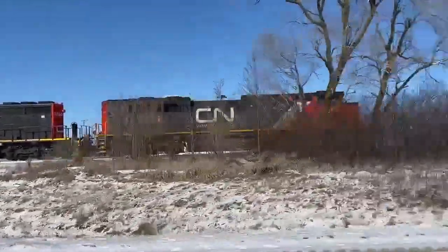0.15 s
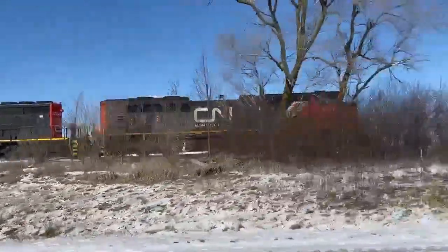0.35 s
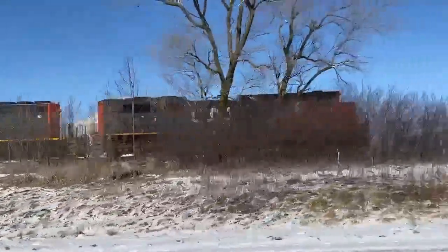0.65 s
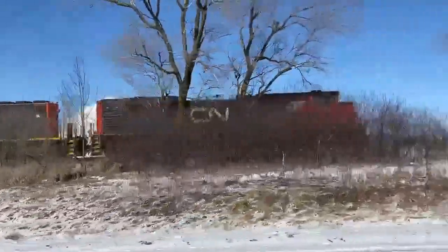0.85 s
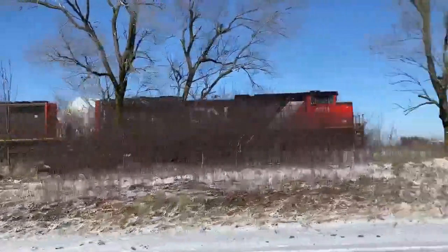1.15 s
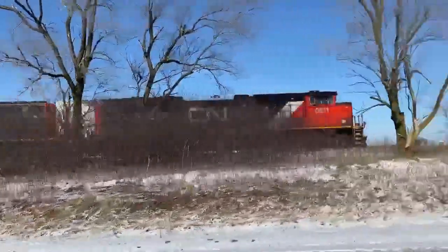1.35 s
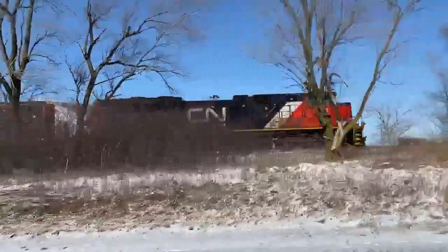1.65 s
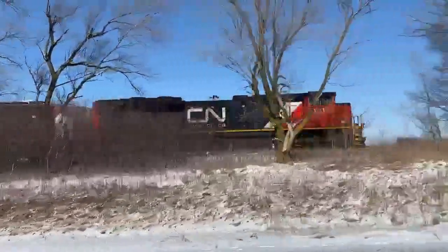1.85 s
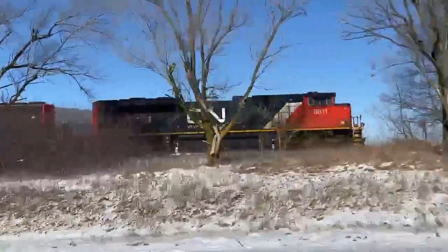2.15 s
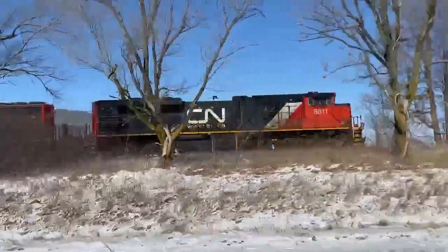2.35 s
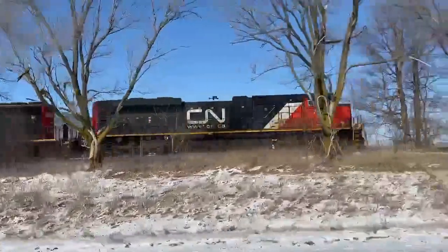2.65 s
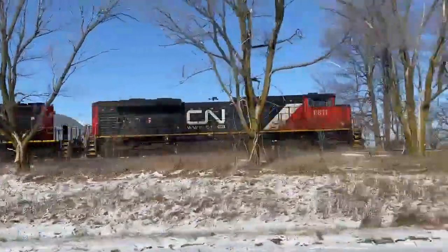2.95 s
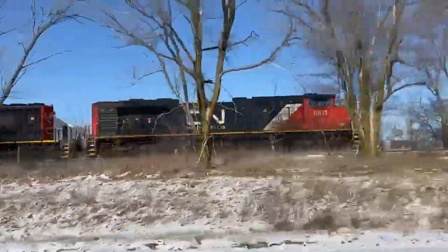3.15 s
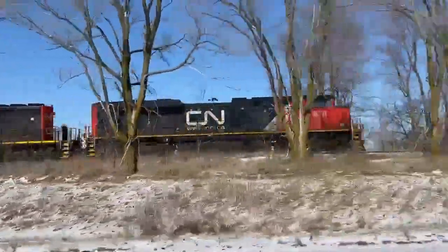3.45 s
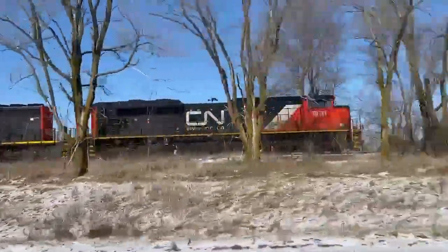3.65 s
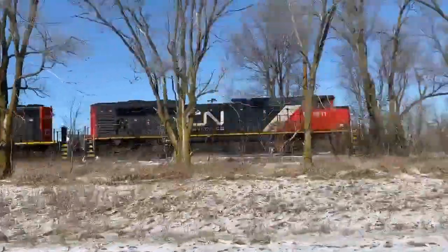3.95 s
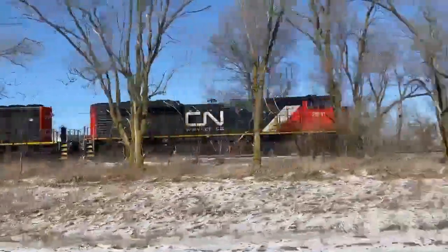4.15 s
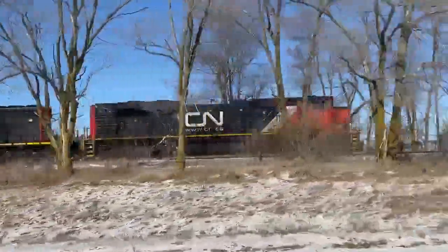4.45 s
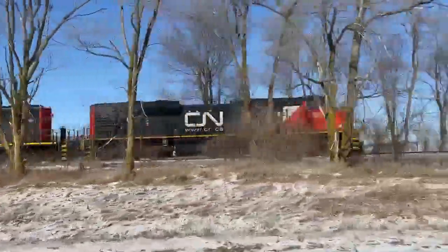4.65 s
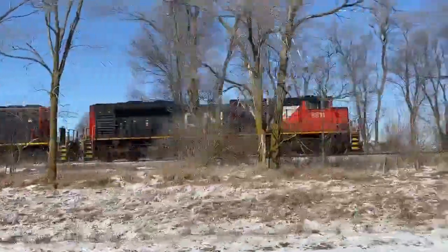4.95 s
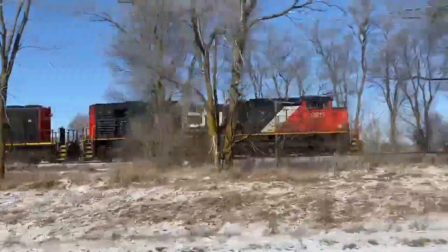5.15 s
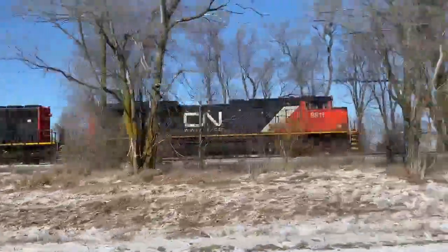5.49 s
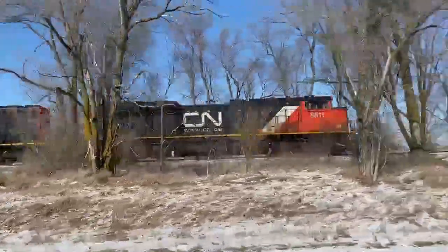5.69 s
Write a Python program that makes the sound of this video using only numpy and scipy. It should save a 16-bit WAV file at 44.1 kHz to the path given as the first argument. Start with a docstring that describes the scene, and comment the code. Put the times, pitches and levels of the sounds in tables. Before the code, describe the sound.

A deep diesel locomotive throb swells and climbs slightly in pitch, over road roar, wind rumble, rattling grit and hollow knocks, heard from a moving car.

```python
"""A deep diesel exhaust throb rules: locomotives speed up behind trees, heard from a car keeping pace.
Each firing is one cycle of a tone; unequal cylinders make it swell and hurry once an engine cycle.
Shaped noise gives the engines' growl, wind at the open window, the roar of wheels and tyres, and hiss.
Resonated noise gives a turbocharger whine and a venting valve; wavering tones give brief wheel squeals.
Short bursts of pitch give road bumps, knocks from the running gear and grit ticking on the car."""
import sys
import numpy as np
from scipy import signal
from scipy.io import wavfile
from scipy.ndimage import uniform_filter1d

SR = 44100
rng = np.random.default_rng(int(sys.argv[2]) if len(sys.argv) > 2 else 0)


def dump(signal):
    """Clip the signal to [-1, 1] and save it as 16-bit WAV at the path in sys.argv[1]."""
    limited = np.clip(np.atleast_2d(signal).T, -1, 1)
    pcm = np.round(limited * 32767).astype(np.int16)
    wavfile.write(sys.argv[1], SR, pcm)


N = 256662  # length in samples

# Rolling roar before splashes, throb and body resonances: t/s, level/dB, brightness/(dB per octave)
ROLLING_CURVE = [(0.0, -40, -0.5), (0.37, -36.5, -1.5), (0.88, -38, -1.5), (1.52, -34, -1),
                 (2.12, -35, 0.5), (2.3, -41.5, 0.5), (2.55, -35.5, -1), (2.82, -33, 2), (2.95, -37.5, 2.5),
                 (3.14, -37.5, 0), (3.29, -35.5, 1), (3.78, -35, 1), (4.08, -35, 2.5), (4.6, -31.5, -1),
                 (4.97, -33, 1.5), (5.2, -31.5, -0.5), (5.55, -30.5, -2), (5.82, -29.5, 1.5)]


def gain_of(db):
    """Turns decibels into an amplitude factor."""
    return 10 ** (np.asarray(db) / 20)


def evened(x):
    """Scales a signal to rms 1."""
    return x / np.sqrt(np.mean(x ** 2) + 1e-20)


def read(points, hz):
    """Reads a spectrum at hz, interpolating on a log-frequency axis."""
    f, value = np.transpose(points)
    return np.interp(np.log(hz + 1), np.log(f + 1), value)


def columns(rows, t):
    """Reads every column of a time curve at times t."""
    s, *values = np.transpose(rows)
    return [np.interp(t, s, v) for v in values]


def resonate(x, hz, width):
    """Shifts hz down to zero, smooths, and shifts back: a resonance of gain 1, width in Hz."""
    turn = np.exp(2j * np.pi * np.cumsum(hz * np.ones(x.shape[-1])) / SR)
    r = np.exp(-np.pi * width / SR)
    smooth = signal.lfilter([1 - r], [1, -r], x / turn)
    return 2 * (turn * smooth).real


def wobble(count, span):
    """Slow random drift of rms 1: white noise averaged twice over span points."""
    span = max(int(span), 1)
    drift = uniform_filter1d(rng.standard_normal(count), span)
    return evened(uniform_filter1d(drift, span))


def noise(colour, curve, band, pivot_hz, patchy_db, flicker_db, size):
    """Stereo noise: a spectrum tilted about a pivot, random patches and a flicker shared by all pitches."""
    # Likeness of left and right: f/Hz, correlation
    likeness = [(200, 1), (260, .93), (350, .7), (500, .45), (900, .38), (1460, .3), (2080, .72),
                (3000, .76), (4200, .82), (6200, .78), (8200, .55), (9800, .36), (11000, .45), (12000, .62)]
    # Stereo lean: f/Hz, left over right/dB
    lean = [(210, 0), (300, 1.1), (1000, 1), (4000, .8), (6200, .4), (8000, -1), (12000, .2)]
    hop, hz = size // 4, np.fft.rfftfreq(size, 1 / SR)
    frames = N // hop + 5
    a, b, c, d, patches = rng.standard_normal((frames, len(hz), 5)).T
    patches = uniform_filter1d(uniform_filter1d(patches, 2560 // hop, 1), size // 80, 0)
    patches = evened(patches)

    level_db, *tilt = columns(curve, np.arange(frames) * hop / SR)
    octaves = np.log2(hz / pivot_hz + .01)[:, None]
    shape = gain_of(read(colour, hz)[:, None] + octaves * sum(tilt, np.zeros(frames)))
    inside = (hz >= band[0]) & (hz <= band[1])
    shape /= np.sqrt((shape[inside] ** 2).sum(0) / 1.5)  # the named band gets rms 1

    same = np.clip(read(likeness, hz), -1, 1)[:, None]
    left = a + 1j * b
    right = same * left + np.sqrt(1 - same ** 2) * (c + 1j * d)
    z = np.array([left, right])
    z *= gain_of(read(lean, hz)[:, None] * np.array([.5, -.5])[:, None, None])
    z *= shape * gain_of(level_db + patchy_db * patches + flicker_db * wobble(frames, 1024 // hop))
    return signal.istft(z, nperseg=size, noverlap=size - hop)[1][:, :N]


def exhaust():
    """One boom a firing; unequal cylinders make it swell and hurry once a cycle. Also gives that swell."""
    # Engine speed: t/s, firing rate f/Hz
    speed = [(0, 67.8), (.4, 68.62), (1.6, 72.5), (2.2, 75.04), (2.5, 75.72), (3.4, 77), (4.4, 78),
             (4.8, 78.18), (5.4, 78.96), (5.82, 79.38)]
    # Exhaust: t/s, level/dB, uneven strength of the cylinders/(0 to 1)
    load = [(0, -25, 0.07), (.25, -28, 0.76), (.37, -22, 0.36), (.48, -26.5, 0.64), (.6, -22.5, 0.72),
            (.9, -24.5, 0.34), (1.1, -17, 0.42), (1.4, -16.5, 0.46), (1.6, -21.5, 0.24), (2, -17, 0.3),
            (2.1, -22.5, 0.03), (2.25, -18.5, 0.15), (2.42, -20.5, .3), (2.5, -25, 0.2), (2.6, -21.5, 0.1),
            (2.72, -23, 0.2), (2.8, -21.5, 0), (3.15, -17.5, 0.2), (3.35, -19.5, 0), (3.52, -18.5, 0.44),
            (3.8, -14, 0.3), (3.9, -15, 0.14), (4.1, -11.5, 0.3), (4.3, -11, 0.1), (4.62, -9.5, 0.1),
            (4.7, -15.5, 0.5), (4.8, -15, 0.25), (4.9, -12, 0.25), (5.2, -10.5, 0.08), (5.3, -10.5, 0.23),
            (5.4, -16, 0.3), (5.55, -13.5, 0.5), (5.65, -18, 0.36), (5.82, -17.5, 0.1)]
    # Weaker tones: multiple of the cycle rate, level under the firing tone/dB
    orders = [(15, -31), (16, -29.5)]
    cylinders = 8  # firings in one engine cycle
    strong_rad = 1.05  # place of the strongest cylinder in the cycle
    slow_hz, fast_hz = 75.5, 77.3  # the timing shifts between these firing rates
    early_slow_rad, early_fast_rad = 0.26, 0.36  # depth of the uneven timing
    place_slow_rad, place_fast_rad = 1.3, .8  # place of the earliest cylinder in the cycle

    t = np.arange(N) / SR
    (hz,), (level_db, uneven) = columns(speed, t), columns(load, t)
    slow = np.clip((fast_hz - hz) / (fast_hz - slow_hz), 0, 1)
    early = early_fast_rad + (early_slow_rad - early_fast_rad) * slow
    place = place_fast_rad + (place_slow_rad - place_fast_rad) * slow
    cycle = 2 * np.pi * np.cumsum(hz / cylinders) / SR
    strength = 1 + uneven * np.cos(cycle - strong_rad)
    boom = strength * np.cos(cylinders * cycle + early * np.cos(cycle - place))
    boom += sum(gain_of(db) * np.cos(order * cycle) for order, db in orders)
    level = np.sqrt(2) * gain_of(level_db + .35 * wobble(N, 1500))
    return level * boom, np.maximum(strength, .1)


def engine_growl(throb, chatter):
    """Low engine noise that swells with the strong cylinders and shakes with uneven combustion."""
    # Growl before throb and chatter: t/s, level/dB, brightness/(dB per octave)
    droning = [(0, -46, -7), (.11, -42.5, 3), (.7, -42, -0.5), (1.3, -37, 2.5), (1.7, -37, 1),
               (2.06, -32, 0.5), (2.22, -38, 4), (2.9, -37.5, 3), (3.1, -39.5, 0), (3.29, -32.5, 3),
               (3.4, -38, 1.2), (4.2, -39, 2), (4.65, -32, 1), (4.76, -31, 3), (4.82, -35.5, -4),
               (5.2, -45, 2), (5.32, -36.5, 1.5), (5.82, -35, 4)]
    # Growl spectrum before the tilt: f/Hz, level/dB
    drone = [(70, -8), (110, 1.5), (160, -0.5), (250, -4), (360, -5), (450, -20), (900, -82)]
    growl = noise(drone, droning, (110, 380), 200, patchy_db=1.5, flicker_db=1.0, size=1024)
    return growl * chatter * throb ** 0.6  # the power sets how closely it follows the cylinders


def wind():
    """Gusts rumble at the open window: low noise with a peak near 50 Hz."""
    # Gusts: t/s, level/dB, brightness/(dB per octave)
    gusts = [(0.0, -48, -1), (0.18, -40, 1), (0.36, -37, -4), (0.5, -42, 3.5), (1.25, -34.5, -0.5),
             (1.6, -36.5, 1), (1.99, -43, 1.5), (2.11, -35.5, -2), (2.59, -38, 2.5), (2.8, -36.5, -1),
             (3.5, -35, 0.5), (3.91, -36, 1.5), (4.1, -33, 0), (4.5, -29, -0.5), (4.8, -29, -0.5),
             (5.3, -29.5, -1), (5.82, -29, -0.5)]
    # Wind spectrum before the tilt: f/Hz, level/dB
    rumble = [(15, -45), (25, -31), (36, -16), (47, 0), (58, 1), (75, -9), (95, -7), (125, -15), (200, -20),
              (350, -30), (700, -88)]
    return noise(rumble, gusts, (25, 55), 60, patchy_db=1.5, flicker_db=.8, size=2048)


def rolling_roar(throb, chatter, splash):
    """Wheel and tyre noise, coloured by drifting cabin and car-body resonances."""
    # Roar spectrum before tilt and resonances: f/Hz, level/dB
    roar_colour = [(80, -38), (160, -17), (300, -19), (420, -8.5), (560, -4), (700, -1.5), (800, -5),
                   (950, -6.5), (1050, -7), (1450, -15), (2050, -15.5), (3200, -26.5), (6000, -67)]
    # Cabin and car-body resonances: f/Hz, width/Hz, level/dB
    body = [(660, 7.8, -10), (783, 8.7, 1), (1019, 10.3, 1), (2067, 8.5, 6.5)]
    roar = noise(roar_colour, ROLLING_CURVE, (400, 1500), 800, patchy_db=1.4, flicker_db=.4, size=512)
    roar *= splash
    roar += sum(gain_of(db) * resonate(roar, hz * (1 + 0.0065 * wobble(N, 2400)), width)
                for hz, width, db in body)
    return roar * chatter * throb ** 0.095  # follows the cylinders faintly


def spray_hiss(throb, splash):
    """Bright noise of spray and air that follows the splashes and, a little, the exhaust throb."""
    # Hiss before splashes and throb: t/s, level/dB, brightness/(dB per octave)
    hissing = [(0, -55, -6), (.42, -49, -2.5), (.66, -52.5, -3.5), (1.15, -49, -3.5), (1.5, -50, -5),
               (2.21, -49, -3.5), (2.235, -40, 0), (2.56, -44.5, 1.5), (2.84, -41.5, 2), (3.01, -43.5, 3),
               (3.18, -43, 1), (3.65, -39, 4), (3.78, -47.5, 1.5), (4.4, -44.5, -1), (4.7, -38, 2),
               (5.12, -45.5, -3.5), (5.4, -42, -4.5), (5.82, -41, -3)]
    # Hiss spectrum before the tilt, with a narrow gap near 9 kHz: f/Hz, level/dB
    hiss_colour = [(700, -7), (1500, 11), (3000, 8), (6000, 6), (8000, 11.5), (8700, 5.5), (9150, -72),
                   (9650, 6), (10000, 9), (11500, 7.5), (12200, -4), (13000, -22)]
    hiss = noise(hiss_colour, hissing, (3000, 7200), 5000, patchy_db=1.5, flicker_db=.5, size=512)
    return hiss * splash * throb ** 0.24


def splashes():
    """Tyres throw up slush: fast-rising, slower-falling gains for the hiss and the roar."""
    # Splashes: t of the peak/s, length/s, swell of the hiss/dB, swell of the roar/dB (negative dips)
    slush = [(0.686, 0.033, 5.5, 2.5), (0.783, 0.066, 7, 1), (1.155, 0.014, 2, 6), (1.396, 0.036, 5.5, 0),
             (1.558, 0.04, 5.5, 0.5), (2.25, 0.11, 3, 5.5), (3.135, 0.14, 2, 5), (3.436, 0.034, 1.5, 4),
             (3.675, 0.04, -1.5, 5.5), (4.029, 0.036, 3, 4.5), (4.208, 0.06, 6, 1.5), (4.573, 0.25, 2.5, 2),
             (4.716, 0.17, -8, 2), (5.188, 0.022, 7.5, -1), (5.288, 0.041, -0.5, 5),
             (5.404, 0.0097, 7, 3.5), (5.475, 0.017, 3.5, -1), (5.578, 0.0063, 4, 10)]
    rise_share = 0.33  # a splash rises in this share of its length
    t = np.arange(0, N / SR + .002, .002)
    db = 0
    for s, length, *swell_db in slush:
        span = np.where(t < s, rise_share * length, length)
        db = db + np.outer(swell_db, np.exp(-((t - s) / span) ** 2))
    return [np.interp(np.arange(N) / SR, t, gain) for gain in gain_of(db)]


def turbo():
    """A fuzzy whistle, noise through a gliding resonance, that climbs with the engine and flutters."""
    # Turbocharger whine: t/s, f/Hz, level/dB
    whistle = [(0, 7620, -51), (.5, 7800, -50), (1, 7960, -48), (1.5, 8160, -48), (2, 8330, -51),
               (2.4, 8420, -56), (2.8, 8500, -70)]
    hz, level_db = columns(whistle, np.arange(N) / SR)
    air = rng.standard_normal((2, N))
    shared_air = air + .45 * air[::-1]  # the sides share part of their noise
    whine = resonate(resonate(shared_air, hz, 420), hz, 420)
    return evened(whine) * gain_of(level_db + 2.5 * wobble(N, 900))


def blast():
    """A valve vents: resonated air noise with a quick rise, short hold and sputtering fade."""
    # Resonances of the vented air: f/Hz, width/Hz, level/dB
    vent = [(1780, 660, -38), (3250, 1000, -39.5)]
    start_s, rise_s, fade_start_s, fade_s = 2.228, 0.005, 0.052, 0.042  # fade start counts from the start
    t, air = np.arange(N) / SR - start_s, rng.standard_normal(N)
    shape = np.clip(t / rise_s, 0, 1) * np.exp(-np.maximum(t - fade_start_s, 0) / fade_s)
    shape *= gain_of(3 * wobble(N, 120))  # it sputters
    return shape * sum(gain_of(db) * evened(resonate(resonate(air, hz, width), hz, width))
                       for hz, width, db in vent)


def squeals():
    """Wavering tones of steel on steel that start firmly and fade."""
    # Wheel squeals: t/s, length/s, f/Hz, waver/Hz, level/dB
    squeal_rows = [(.355, .07, 5600, 120, -58), (1.045, .016, 1850, 40, -42), (1.492, .022, 1950, 40, -40),
                   (1.535, .16, 4540, 30, -50.5), (2.12, .13, 4540, 45, -53), (2.82, .045, 2780, 30, -44),
                   (2.848, .15, 1770, 35, -44), (3.14, .08, 4500, 35, -47.5), (3.15, .09, 4030, 40, -48.5),
                   (3.09, .06, 2250, 30, -45), (3.19, .05, 1850, 25, -44), (1.71, .05, 2080, 30, -46),
                   (4.52, .14, 2080, 30, -46), (4.83, .08, 2080, 30, -45), (5.801, .016, 2130, 30, -36),
                   (4.59, .06, 2630, 18, -40), (4.53, .035, 2950, 30, -44), (4.39, .04, 2080, 30, -43)]
    out = np.zeros(N)
    for s, length, hz, waver_hz, db in squeal_rows:
        count = round(length * SR)
        tone = np.sin(2 * np.pi * np.cumsum(hz + waver_hz * wobble(count, 150)) / SR)
        fade_db = np.linspace(3, -7, count) + 1.5 * wobble(count, 400) + 2.5 * wobble(count, 70)
        fade = signal.windows.tukey(count, .25) * gain_of(fade_db)
        out[round(s * SR):][:count] += np.sqrt(2) * gain_of(db) * tone * fade
    return out


def bursts(rows):
    """Soft-edged bursts of a single pitch, each a cosine under a bell-shaped envelope."""
    t = np.arange(N) / SR
    return sum(gain_of(db) * np.cos(2 * np.pi * hz * (t - s)) * np.exp(-((t - s) / length) ** 2)
               for s, hz, length, db in rows)


def road_bumps():
    """Bumps in the road give deep thumps."""
    # Bumps: t of the peak/s, f/Hz, length/s, peak level/dB
    bump_rows = [(1.169, 61.5, 0.055, -21), (1.955, 67.5, 0.06, -19), (3.833, 82.7, 0.16, -21),
                 (4.02, 47, 0.058, -18.5), (5.305, 58, 0.15, -21.5)]
    return bursts(bump_rows)


def gear_knocks():
    """The running gear gives short hollow knocks."""
    # Knocks: t of the peak/s, f/Hz, length/s, peak level/dB
    knock_rows = [(1.285, 300, 0.01, -29), (1.44, 523, 0.0083, -33), (1.61, 240, 0.01, -38),
                  (2.225, 695, 0.0095, -31.5), (2.335, 660, .008, -37), (2.791, 915, 0.011, -37),
                  (2.814, 630, 0.012, -32), (3.115, 794, 0.01, -30), (3.273, 296, 0.0071, -23),
                  (3.609, 775, 0.0084, -27.5), (4.073, 373, 0.01, -31), (4.29, 1095, .01, -31.5),
                  (4.355, 290, 0.0071, -27.5), (4.4, 620, 0.0095, -27.5), (4.46, 830, 0.0093, -27),
                  (4.49, 640, 0.014, -24.5), (4.582, 685, 0.013, -44), (4.612, 495, .012, -27),
                  (4.659, 565, 0.0068, -22), (4.732, 605, .012, -24), (5.49, 1060, 0.0093, -26)]
    return bursts(knock_rows)


def grit(swell):
    """Dull ticks on the bodywork, the larger ones listed, over a patter of small ones that ring loose panels."""
    # Larger ticks: t/s, approximate peak level/dB, f/Hz
    ticks = [(.301, -29, 1400), (.509, -28, 2200), (.688, -27, 2600), (.705, -28, 1500), (.886, -29, 2200),
             (.972, -24, 1000), (1.092, -29, 1700), (1.179, -25, 800), (1.27, -30, 3300), (1.301, -26, 900),
             (1.39, -27, 1900), (1.153, -20, 1100), (1.156, -19, 900), (1.226, -28, 1400),
             (1.371, -27, 1400), (1.499, -27, 1800), (1.561, -27, 2800), (1.683, -28, 2300),
             (1.752, -27, 2200), (1.822, -26, 2000), (1.925, -28, 2000), (2.014, -25, 2000),
             (2.048, -28, 1600), (2.255, -21, 1900), (2.267, -21, 2300), (2.625, -25, 1400),
             (2.64, -26, 1100), (2.79, -26, 2000), (2.818, -24, 1700), (3.123, -23, 1900),
             (3.332, -24, 1100), (3.657, -25, 1400), (4.608, -19, 900), (4.744, -22, 1800),
             (4.978, -24, 1400), (5.273, -22, 900), (5.311, -18, 900), (5.39, -22, 1400),
             (5.442, -21, 1300), (5.482, -20, 1100), (5.737, -21, 1100), (5.569, -9, 1400),
             (5.572, -17, 1700)]
    # Loose panels: f/Hz, ring length/cycles
    panels = [(300, 1.54), (532, 3.5), (668, 12), (783, 1.2), (1070, 1.2), (1310, 0.47), (1780, 1.3),
              (2290, 0.98), (1500, 7), (1700, 8), (1950, 9), (2100, 10), (2450, 5), (2000, .5)]
    t, out = np.arange(-400, 400) / SR, np.zeros(N + 800)

    def tick(hz, cycles):
        """A sine under a bell-shaped envelope, its length set in cycles."""
        return np.sin(2 * np.pi * hz * t) * np.exp(-(t * hz / cycles) ** 2)

    for s, db, hz in ticks:
        start = round((s + .0007) * SR) - 400
        out[start:][:len(t)] += gain_of(db + 3) * tick(hz, .45)  # +3 dB: the envelope lowers the peak

    hits = rng.random(N) < 350 / SR  # 350 small hits a second on average
    size = gain_of(3 * np.minimum(rng.exponential(1, N), 2)) * hits
    roar_db = columns(ROLLING_CURVE, np.arange(N) / SR)[0]
    size *= gain_of(roar_db - 11.0) * swell  # louder roar, harder patter
    kind = rng.integers(0, len(panels), N)
    for k, (hz, cycles) in enumerate(panels):
        ring = tick(hz, cycles) / np.sqrt(1 + cycles / 3)
        out[:N] += signal.oaconvolve(size * (kind == k), ring)[:N]
    return out[:N] * gain_of([[.5], [-.5]])  # leans to the left


def scene():
    """Mixes at the car window: exhaust in the middle, roar and hiss spread."""
    booms, throb = exhaust()
    chatter = gain_of(1.3 * wobble(N, 100))  # uneven combustion shakes growl and roar together
    hiss_splash, roar_splash = splashes()
    engines = booms + engine_growl(throb, chatter) + turbo()
    rolling = rolling_roar(throb, chatter, roar_splash) + squeals() + road_bumps() + gear_knocks()
    air = wind() + spray_hiss(throb, hiss_splash) + blast()
    return engines + rolling + air + grit(roar_splash)


def record(dry):
    """The microphone sheds the lowest bass; a steep low-pass then limits the treble."""
    lean = signal.sosfilt(signal.butter(3, 37, "high", fs=SR, output="sos"), dry)
    low_pass = signal.firwin(511, 12850, window=("kaiser", 9), fs=SR)  # edge in Hz
    return signal.oaconvolve(lean, low_pass[None], "same")


dry = scene()
out = record(dry)
dump(out)
```